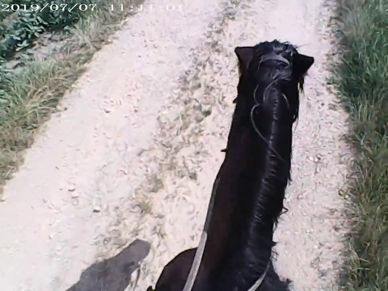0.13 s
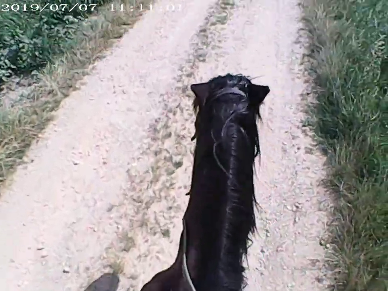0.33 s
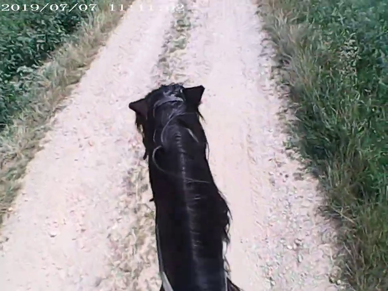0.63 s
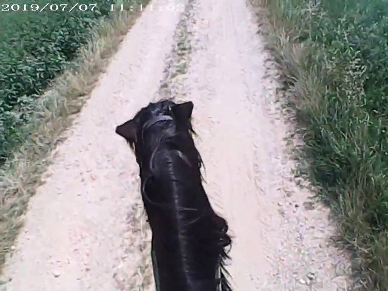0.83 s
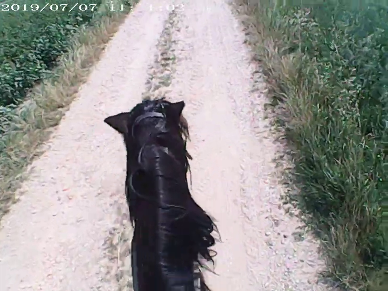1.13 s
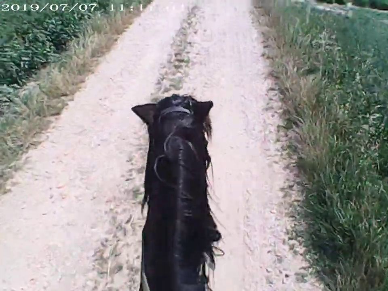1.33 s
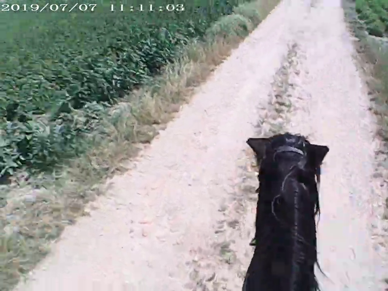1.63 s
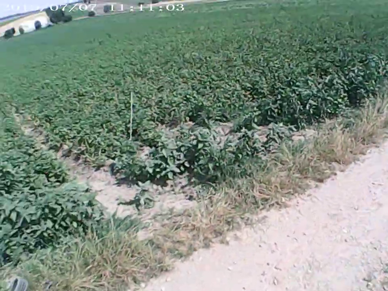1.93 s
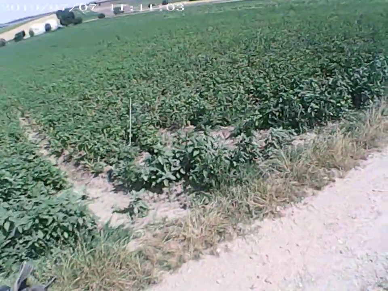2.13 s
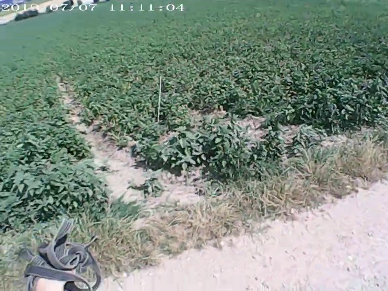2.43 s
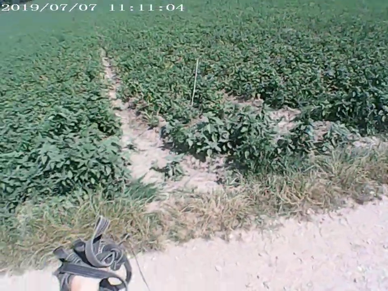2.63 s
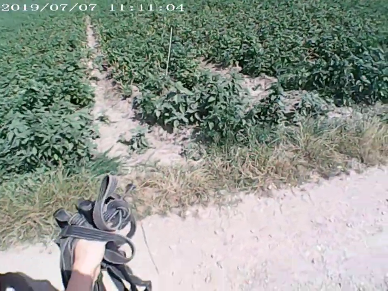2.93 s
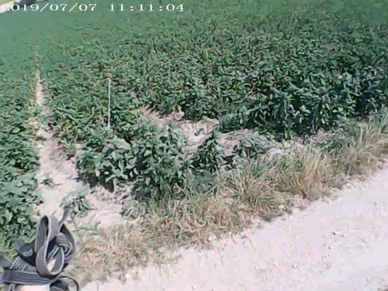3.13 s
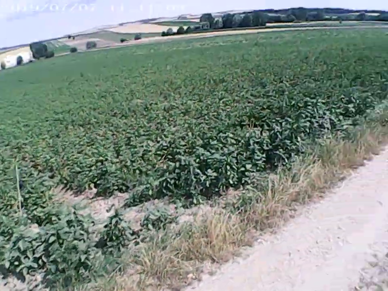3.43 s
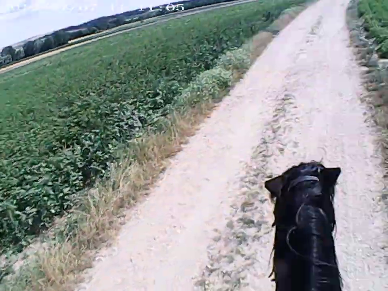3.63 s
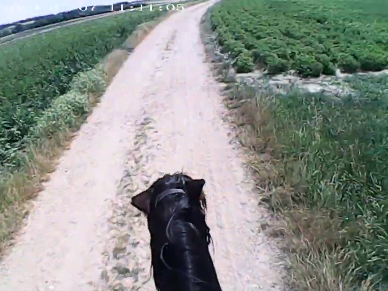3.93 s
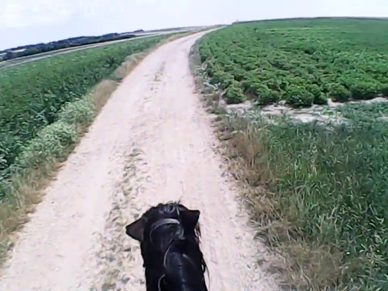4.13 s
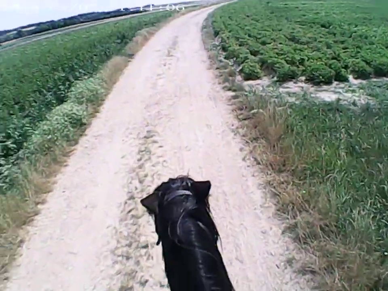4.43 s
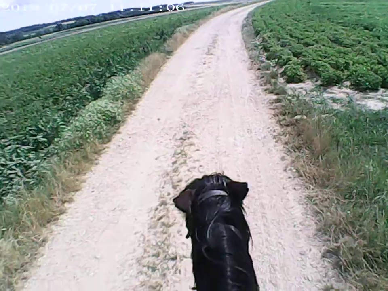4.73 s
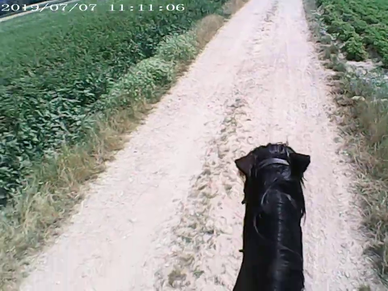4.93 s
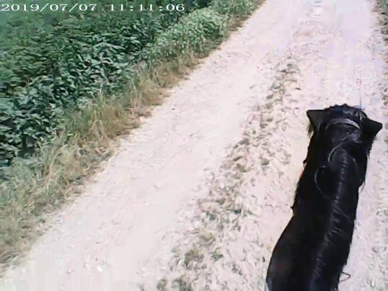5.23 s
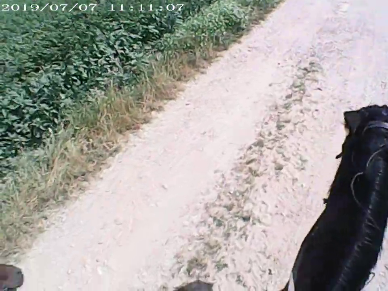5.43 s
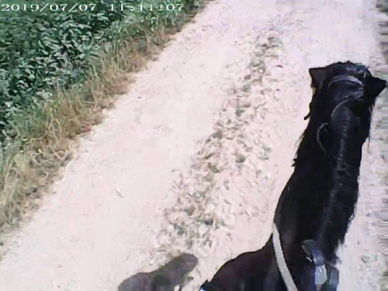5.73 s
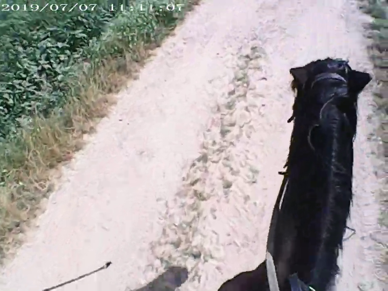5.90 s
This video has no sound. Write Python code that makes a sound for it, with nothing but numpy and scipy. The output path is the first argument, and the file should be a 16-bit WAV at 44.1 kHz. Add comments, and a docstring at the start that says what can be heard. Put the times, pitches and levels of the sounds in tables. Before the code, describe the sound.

Heard from the saddle, a horse walks a dry stony path: dull treads, a few sharper hoof knocks, gritty scuffs and small leather rubs over hiss.

```python
"""Hooves pat softly in the dust of a dry gravel track, now and then with a hollow knock, heard from the saddle.
Knocks, treads and saddle bumps are damped resonances at listed times.
Grit, pebbles and rubbing tack are random tiny contacts through band-pass resonances.
A faint air rumble on the microphone and a small recorder's hiss are shaped noise."""
import sys
import numpy as np
from scipy import signal
from scipy.fft import rfft, irfft
from scipy.io import wavfile

SR = 44100
rng = np.random.default_rng(int(sys.argv[2]) if len(sys.argv) > 2 else 0)


def wav_out(sig):
    """Save sig, one row per channel (or a flat mono array), as 16-bit PCM at SR to the path in sys.argv[1]."""
    wavfile.write(sys.argv[1], SR, np.round(np.clip(np.atleast_2d(sig).T, -1, 1) * 32767).astype(np.int16))


N = 267466
T = np.arange(N) / SR

# Knocks: hollow hoof knocks, plus two small ringing stones (2.2168 s and 3.63 s) sounded through the same
# modes. # Each row: start in seconds, drive in dB, then weight, clack and edge drive in dB re that, # body
# pitch ratio, ring length ratio.
KNOCKS = [(0.529, -36.5, -26, 4.5, -1, 1.03, 0.9), (0.9711, -34.5, -11.5, 3.5, -3, 1.03, 1.06),
          (0.981, -43, -11.5, 7, -4, 0.84, 1.2), (1.069, -35.5, -11, -7.5, -21, 1.03, 1.18),
          (1.1095, -45.5, -5, 6.5, 8, 0.9, 0.68), (2.09, -28.5, 7.5, 3.5, 4, 0.94, 1.4),
          (2.0969, -29.5, -13, -5, -21, 0.97, 1.76), (2.2168, -54, -8, 13, 6, 1.0, 1.5),
          (2.7686, -24.5, 5.5, 7, 4, 0.97, 1.45), (2.780, -35, -7.5, -21, -11, 0.83, 2.1),
          (3.63, -42, -5, -6, -10, 0.98, 1.3), (3.972, -32.5, -0.5, -2, -9, 1.07, 0.88),
          (4.8898, -33.5, -25, 2.5, -3, 1.03, 1.2), (5.8011, -34.5, -7, 3.5, 10.5, 1.19, 1.16),
          (5.811, -44, 6.5, 4.5, 16, 0.79, 0.77), (5.8202, -39.5, -4, -22, 2, 1.1, 1.26)]
# Soft treads in the dust. Each row: start in seconds, peak in dB.
SOFT_TREADS = [(0.7478, -47), (0.8775, -34.5), (1.0432, -45.5), (1.5615, -36.5), (2.161, -41), (2.369, -47),
               (2.8928, -45), (3.074, -34), (3.298, -37.5), (3.5686, -34.5), (4.3564, -30), (4.528, -37),
               (4.6415, -35), (4.9572, -43), (5.2983, -31.5)]
# Grit resonances, low and high. Each row: centre in Hz, width in Hz, gain in dB.
GRIT_BODY_BANDS = [(911, 230, -6.5), (1277, 260, 0.5)]
GRIT_EDGE_BANDS = [(2052, 356, 2), (2450, 490, -18), (3370, 790, -10), (4360, 620, -10.5)]


def from_db(db):
    """Decibels to gain."""
    return 10 ** (np.asarray(db) / 20)


def rms_one(x):
    """Scale to unit rms."""
    return x / np.sqrt(np.mean(x ** 2) + 1e-20)


def add(out, start_s, sound):
    """Mix a sound in from start_s."""
    start = int(start_s * SR)
    out[start:start + len(sound)] += sound[:N - start]


def cut(x, hz, kind, order=2):
    """Butterworth low- or high-pass."""
    return signal.sosfilt(signal.butter(order, hz, kind, fs=SR, output="sos"), x)


def resonate(x, bands):
    """Parallel Butterworth band-passes, summed at their gains."""
    out = np.zeros(len(x))
    for hz, width_hz, db in bands:
        edges_hz = [max(hz - width_hz / 2, 20), hz + width_hz / 2]
        sos = signal.butter(2, edges_hz, "band", fs=SR, output="sos")
        out += from_db(db) * signal.sosfilt(sos, x + 1e-18)
    return out


def noise(colour):
    """Steady noise of a given spectrum, rms 1."""
    hz, db = np.transpose(colour)
    log_hz = np.log(np.fft.rfftfreq(N, 1 / SR) + 1)   # +1 avoids log 0
    gain = from_db(np.interp(log_hz, np.log(hz), db))
    return rms_one(irfft(rfft(rng.standard_normal(N)) * gain, N))


def grains(per_s, spread_db):
    """Random tiny contacts: many weak, a few strong, either sign."""
    sizes_db = spread_db * np.minimum(rng.exponential(1, N), 4)
    sizes = from_db(sizes_db) * rng.choice([-1, 1], N)
    return sizes * (rng.random(N) < per_s / SR)


def clumps(per_s, spread_db):
    """A gain that jumps about as the grit catches and gives way."""
    steps_db = rng.normal(0, spread_db, int(T[-1] * per_s) + 2)
    return from_db(np.interp(T * per_s, np.arange(len(steps_db)), steps_db))


def mode(t, hz, swell_s):
    """A damped ring whose envelope swells to 1 at swell_s and dies away."""
    envelope = t / swell_s * np.exp(1 - t / swell_s)
    return envelope * np.sin(2 * np.pi * hz * t)


def sway(period_s=0.629, peak_s=0.42):
    """The rider's rocking, from -1 to 1, once per foreleg step."""
    return np.cos(2 * np.pi * (T - peak_s) / period_s)


def air(mean_db=-61.5, swing_db=1.3):
    """A faint rumble on the microphone, strongest at the top of each sway."""
    # Each row: frequency in Hz, relative density in dB.
    air_colour = [(15, -2), (30, 2.5), (50, -4), (76, 0), (110, -16), (160, -10), (220, -18), (400, -39.5),
                  (1000, -62.5)]
    return from_db(mean_db + swing_db * sway()) * noise(air_colour)


def friction_gains():
    """Crunch and rub gains: grit grinds after footfalls, tack rubs with the sway, scuffs swell out of both."""
    # Drawn-out scuffs. Each row: middle in seconds, half length in seconds, rub in dB, crunch in dB
    # (both before the tack and gravel trims).
    scuffs = [(0.244, 0.019, -59, -50.5), (0.293, 0.04, -61.5, -55.5), (0.44, 0.025, -74, -60.5),
              (1.165, 0.079, -58, -68), (1.385, 0.064, -62, -56), (1.624, 0.036, -50, -53),
              (1.795, 0.029, -52.5, -55), (2.204, 0.0086, -50, -76), (2.266, 0.026, -56, -73),
              (2.51, 0.08, -66.5, -62.5), (3.441, 0.022, -51.5, -53), (3.50, 0.04, -54, -60.5),
              (3.582, 0.02, -52, -55), (3.646, 0.018, -51, -53), (4.505, 0.056, -62, -61),
              (4.79, 0.09, -58.5, -58.5), (5.04, 0.068, -66, -59), (5.393, 0.016, -51, -57.5),
              (5.538, 0.014, -58, -49.5), (5.593, 0.058, -60, -57)]
    bed_db, roll_db, roll_peak_s = -65.5, -67, 0.09   # constant grind; peak as weight rolls over a landed hoof
    rub_db, rub_swing_db = -68.5, 1.5
    roll = np.zeros(N)
    for start_s, *_ in KNOCKS + SOFT_TREADS:
        age = np.maximum(T - start_s, 0) / roll_peak_s
        roll = np.maximum(roll, age * np.exp(1 - age))
    crunch_power = from_db(bed_db) ** 2 + (from_db(roll_db) * roll) ** 2
    rub_power = from_db(rub_db + rub_swing_db * sway()) ** 2
    for middle_s, half_length_s, scuff_rub_db, scuff_crunch_db in scuffs:
        swell = np.exp(-((T - middle_s) / half_length_s) ** 2)
        crunch_power = crunch_power + from_db(scuff_crunch_db) ** 2 * swell
        rub_power = rub_power + from_db(scuff_rub_db) ** 2 * swell
    return np.sqrt(crunch_power), np.sqrt(rub_power)


def tack(trim_db=0.75):
    """Leather and cloth rub in small, dull slips."""
    # Each row: centre in Hz, width in Hz, gain in dB.
    tack_bands = [(190, 180, -6.5), (424.3, 116, 4.5), (504.5, 79, -2.5), (615, 16, -10.5)]
    slips = grains(per_s=990, spread_db=1.5)
    return from_db(trim_db) * rms_one(resonate(slips, tack_bands))


def bumps(swell_cycles=0.7):
    """The saddle takes the rider's weight with a damped thud; the deeper it is, the longer it lasts."""
    # Each row: start in seconds, envelope peak in dB, pitch in Hz.
    saddle_bumps = [(0.19, -47, 58), (0.746, -53.5, 166), (0.811, -49.5, 205), (1.175, -52, 72),
                    (1.555, -53, 70), (1.621, -43, 190), (1.795, -52.5, 85.4), (2.105, -50, 55),
                    (2.79, -45, 41.8), (4.085, -47, 55), (4.79, -49.5, 44.7), (4.789, -48.5, 176),
                    (5.384, -47.5, 165), (5.47, -48, 68), (5.553, -41, 245)]
    out = np.zeros(N)
    for start_s, peak_db, hz in saddle_bumps:
        add(out, start_s, from_db(peak_db) * mode(T[:SR // 4], hz, swell_cycles / hz))
    return out


def gravel(trim_db=-1.0, body_db=4.5):
    """Fine grit grinds in uneven clumps of contacts."""
    contacts = grains(per_s=1100, spread_db=2.0) * clumps(per_s=49, spread_db=3.5)
    edge = resonate(contacts, GRIT_EDGE_BANDS)
    body = resonate(contacts, GRIT_BODY_BANDS)
    return from_db(trim_db) * rms_one(edge + from_db(body_db) * body)


def pebbles(snap_db=7):
    """A stone lets go with a snap, then slips with a short, dying burst of contacts."""
    # Each row: start in seconds, level in dB, decay time in seconds, low grit body in dB re level.
    pebble_slips = [(0.7865, -52, 0.02, 6), (0.898, -49, 0.0055, -8), (1.122, -57.5, 0.012, 8.5),
                    (1.505, -56.5, 0.014, -5), (2.818, -53, 0.028, 0.5), (2.89, -45.5, 0.0043, 3),
                    (3.032, -47, 0.0028, -11), (3.092, -48, 0.012, 0.5), (3.648, -55.5, 0.0099, 14.5),
                    (3.846, -54.5, 0.01, 2), (4.0295, -54.5, 0.017, 4), (4.148, -52, 0.015, 5.5),
                    (4.361, -51, 0.0069, -11), (4.518, -53, 0.0089, -13), (4.642, -53, 0.004, -4),
                    (4.692, -52, 0.0081, -5), (5.296, -53.5, 0.004, 1), (5.7393, -50.5, 0.018, 4),
                    (5.841, -53, 0.031, 0.5), (5.895, -43.5, 0.0035, -1), (5.943, -50, 0.005, 2.5)]
    edge_gain, body_gain = np.zeros(N), np.zeros(N)
    contacts = grains(per_s=6400, spread_db=2.5)
    gain = 1 / resonate(contacts, GRIT_EDGE_BANDS).std()   # set before the snaps go in
    for start_s, db, decay_s, body_db in pebble_slips:
        slip = from_db(db) * np.exp(-T[:SR // 8] / decay_s)
        add(edge_gain, start_s, slip)
        add(body_gain, start_s, slip * from_db(body_db))
        add(contacts, start_s, from_db([snap_db]))
    edge = resonate(contacts * edge_gain, GRIT_EDGE_BANDS)
    body = resonate(contacts * body_gain, GRIT_BODY_BANDS)
    return gain * (edge + body)


def treads(low_hz=205, dull_hz=1080, ring_hz=410, width_hz=130, ring_db=7):
    """Dust cushions the hoof and swallows the treble: one dull push with a short, low ring."""
    out = np.zeros(N)
    push = cut(signal.unit_impulse(SR // 16), low_hz, "high", order=4)
    push = cut(push, dull_hz, "low", order=4)
    b, a = signal.iirpeak(ring_hz, ring_hz / width_hz, fs=SR)
    push = push + from_db(ring_db) * signal.lfilter(b, a, push)
    push = push / np.abs(push).max()
    for start_s, peak_db in SOFT_TREADS:
        add(out, start_s, -from_db(peak_db) * push)
    return out


def knocks():
    """Every knock rings the same modes; weight feeds the heavy ones, a hard contact the clack and edge."""
    # Mode lists by family. Each row: pitch in Hz, swell and decay time in seconds, gain in dB;
    # body pitches and all times are scaled by each knock's ratios.
    knock_modes = {"weight": [(87, 0.0093, -24.5), (180, 0.0023, -18), (588, 0.0023, -6),
                   (1098, 0.0011, -11.5), (812, 0.0034, -19.5)], "body": [(451, 0.0029, -1),
                   (361, 0.0031, -9.5)], "clack": [(1342, 0.0014, -2), (1620, 0.00037, -14.5)],
                   "edge": [(1914, 0.0018, -14), (2198, 0.0014, -21), (3420, 0.00037, -22.5)]}
    out, t = np.zeros(N), T[:SR // 8]
    for start_s, level_db, weight_db, clack_db, edge_db, pitch, length in KNOCKS:
        drive_db = {"weight": weight_db, "body": 0, "clack": clack_db, "edge": edge_db}
        for family, rows in knock_modes.items():
            tuning = pitch if family == "body" else 1   # the hollow note shifts from blow to blow
            for k, (hz, swell_s, db) in enumerate(rows):
                sign = (-1) ** k   # neighbouring modes swing in opposite directions
                ring = sign * mode(t, hz * tuning, swell_s * length)
                add(out, start_s, from_db(level_db + drive_db[family] + db) * ring)
    return out


def scene():
    """Hooves and tack in the open air, with no echo."""
    crunch, rub = friction_gains()
    background = air() + rub * tack() + bumps()
    hooves = crunch * gravel() + pebbles() + treads() + knocks()
    return (background + hooves)[None]


def record(dry, hiss_db=-59, cutoff_hz=7100):
    """The recorder adds its hiss, then a steep elliptic low-pass cuts the top."""
    # Each row: frequency in Hz, relative density in dB.
    hiss_colour = [(30, -9.5), (200, 6), (700, 3), (1000, 3), (2600, -2), (4300, -1.5), (5400, -3),
                   (6500, -2), (7200, -13)]
    hissy = dry + from_db(hiss_db) * noise(hiss_colour)
    low_pass = signal.ellip(8, .2, 48, cutoff_hz, fs=SR, output="sos")
    return signal.sosfilt(low_pass, hissy)


dry = scene()
out = record(dry)
wav_out(out)
```